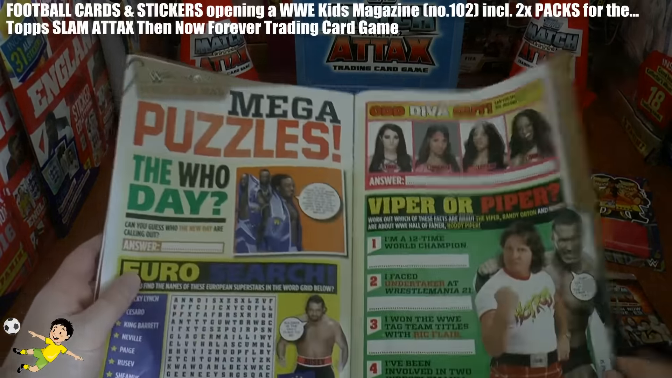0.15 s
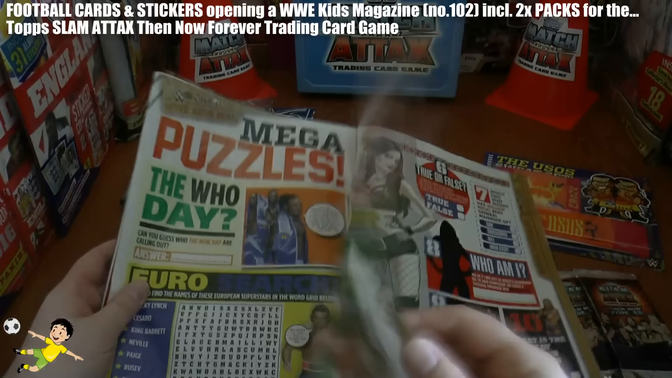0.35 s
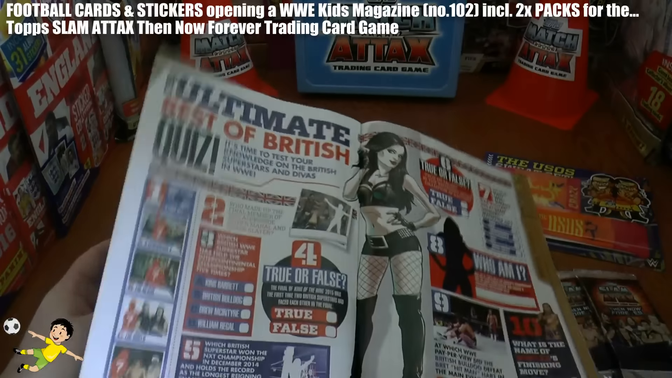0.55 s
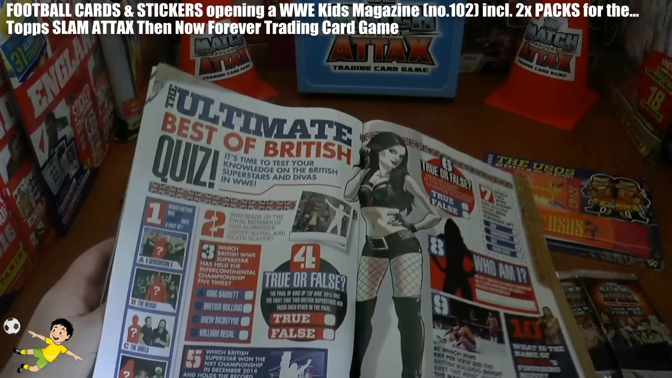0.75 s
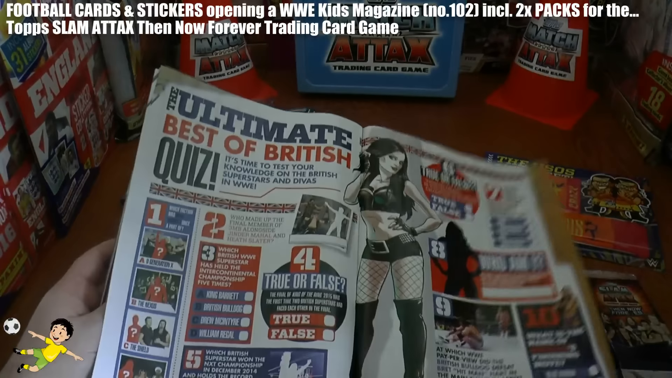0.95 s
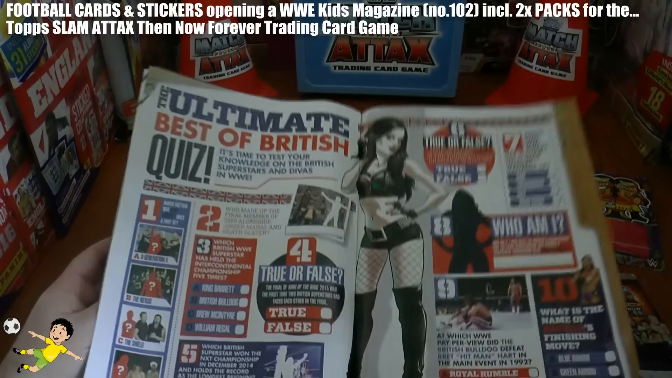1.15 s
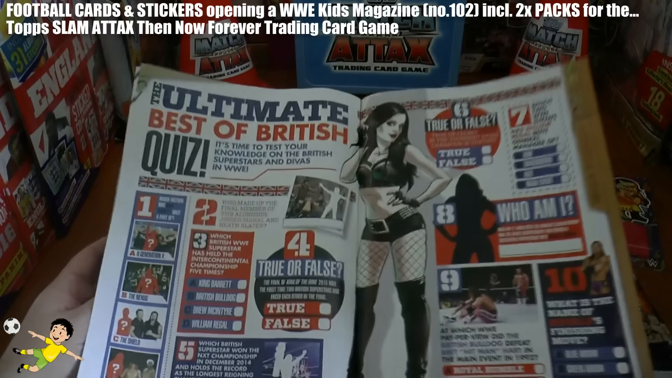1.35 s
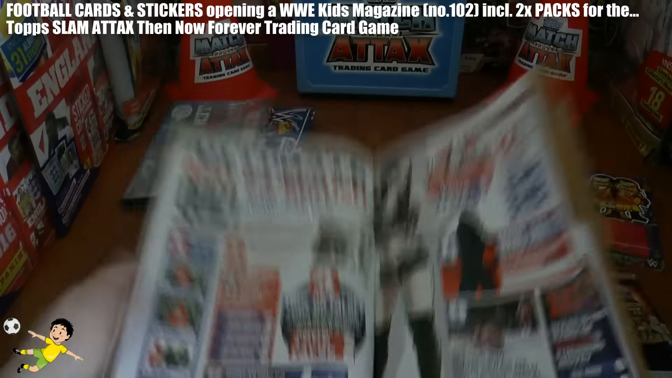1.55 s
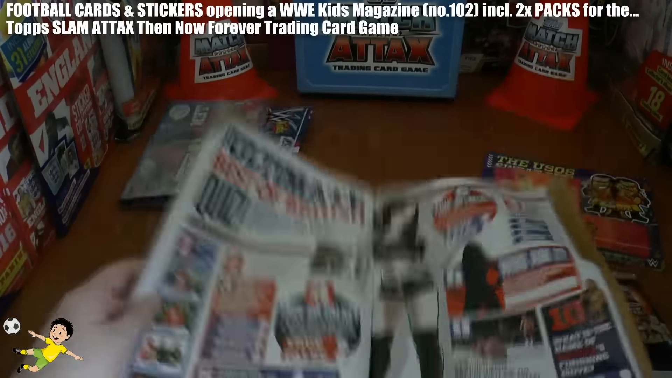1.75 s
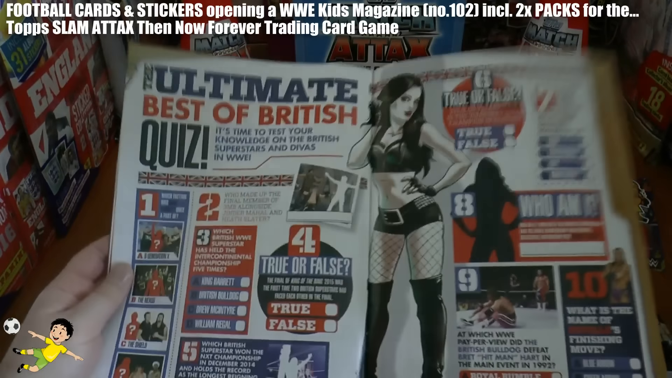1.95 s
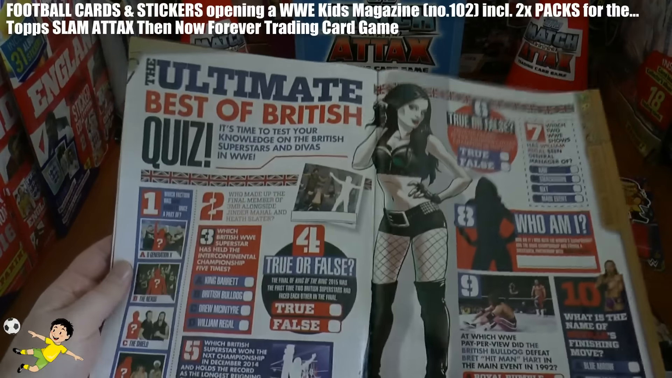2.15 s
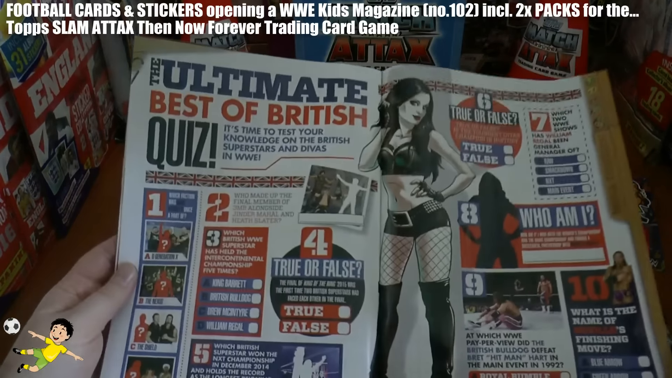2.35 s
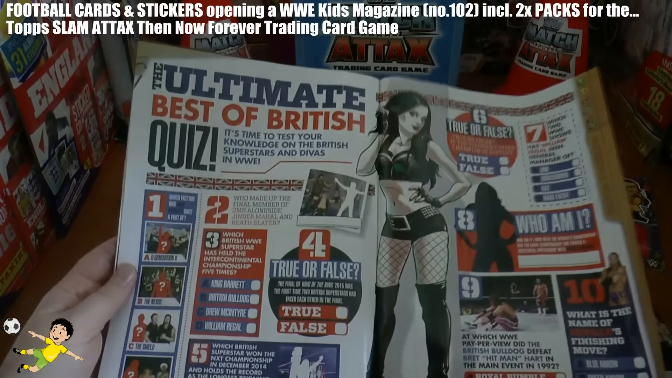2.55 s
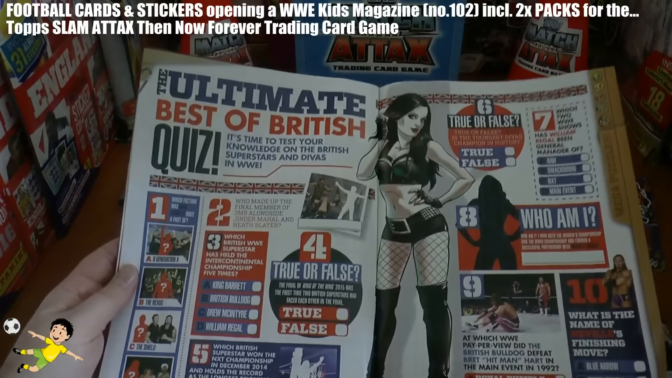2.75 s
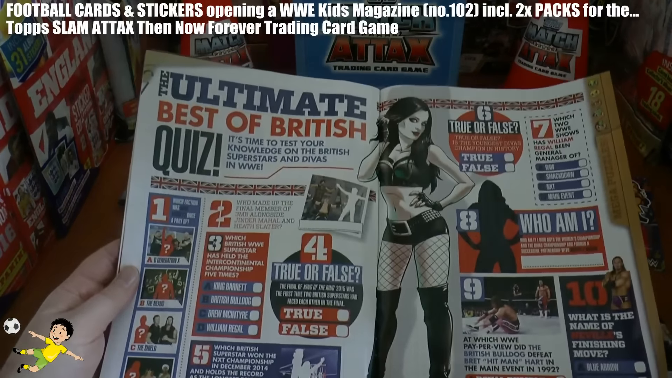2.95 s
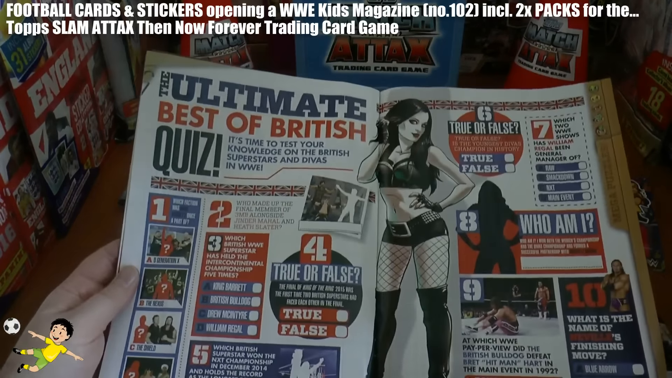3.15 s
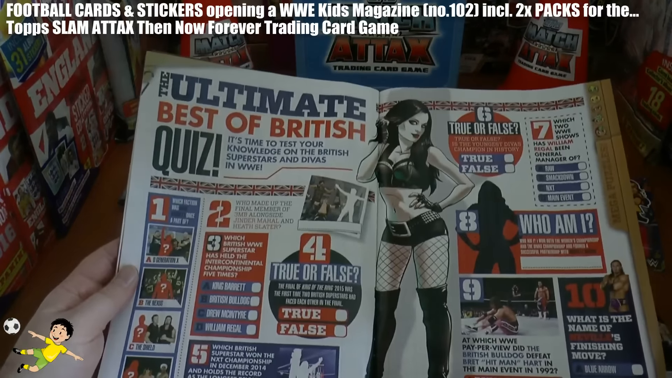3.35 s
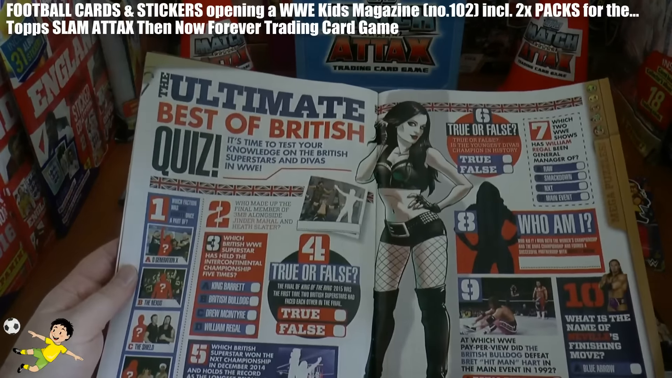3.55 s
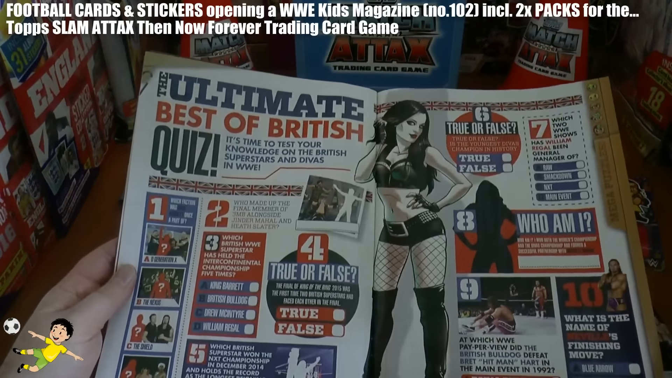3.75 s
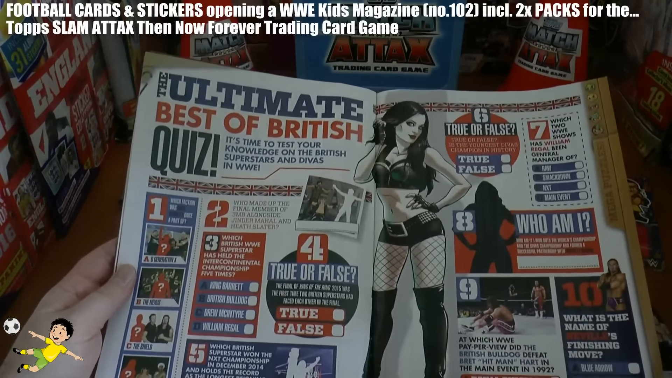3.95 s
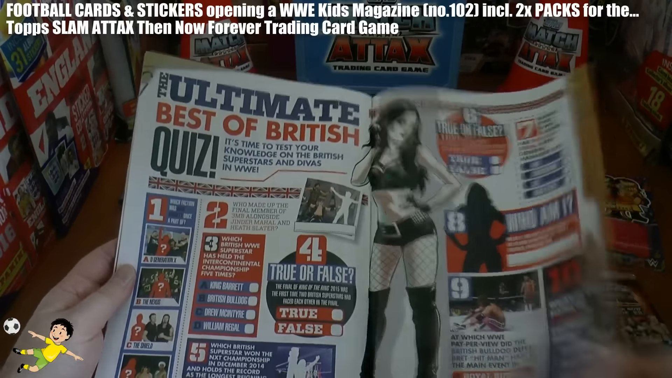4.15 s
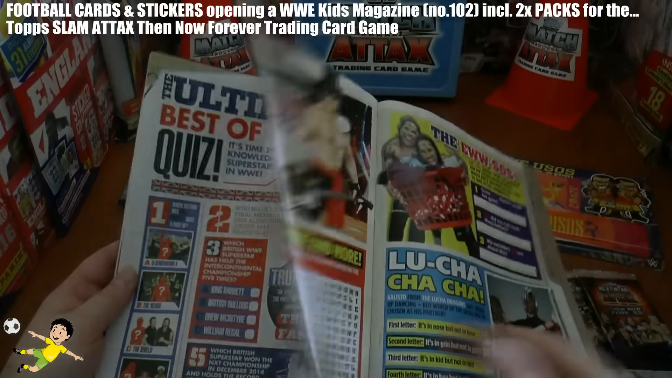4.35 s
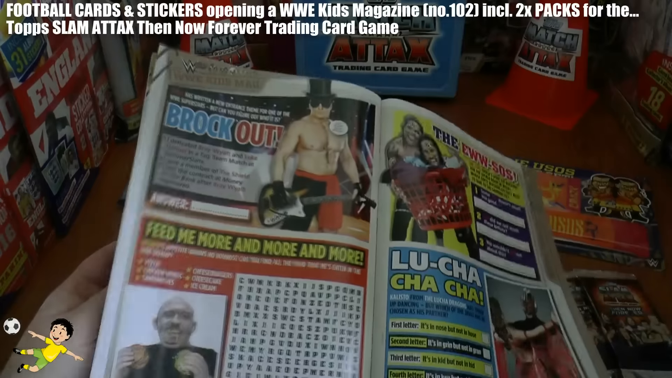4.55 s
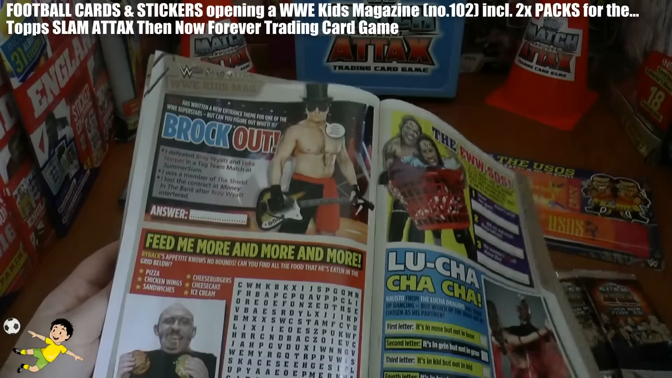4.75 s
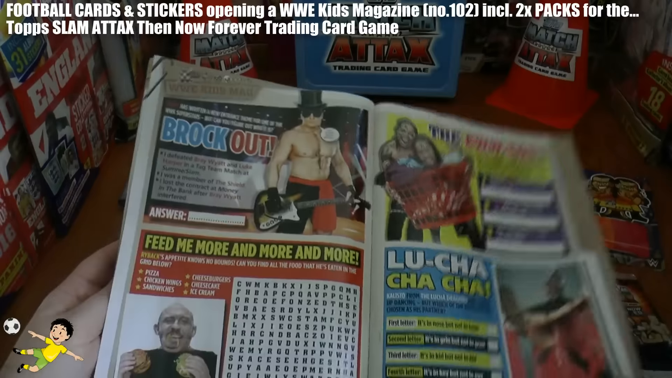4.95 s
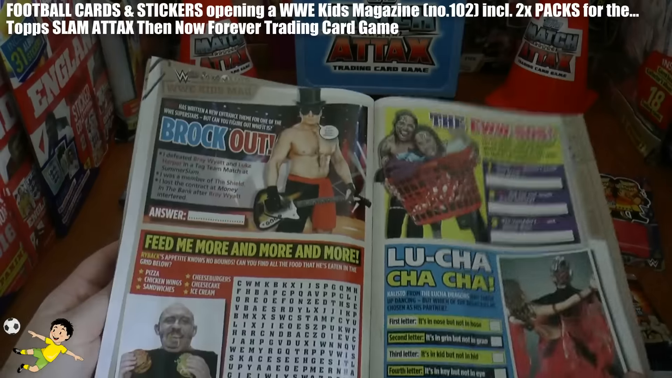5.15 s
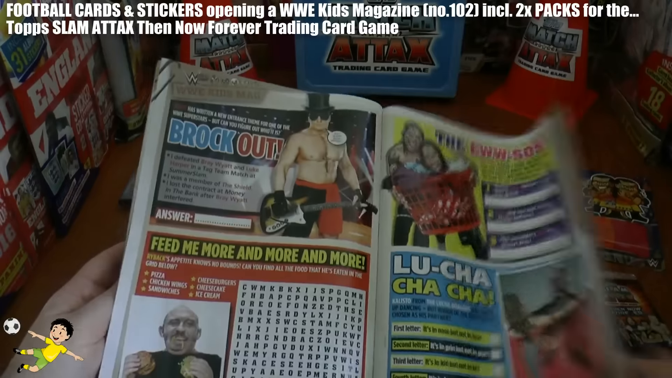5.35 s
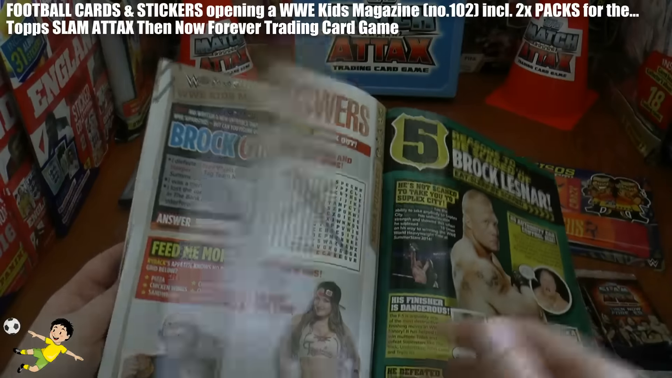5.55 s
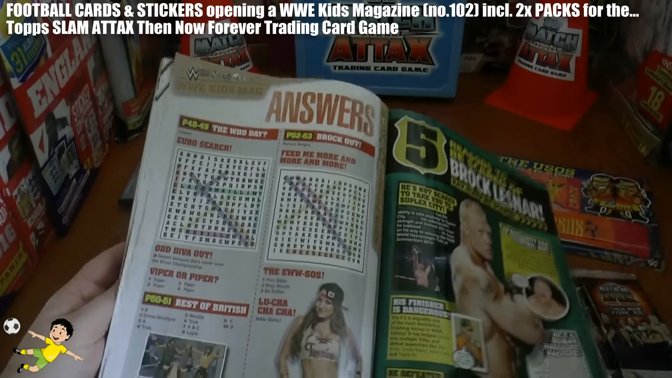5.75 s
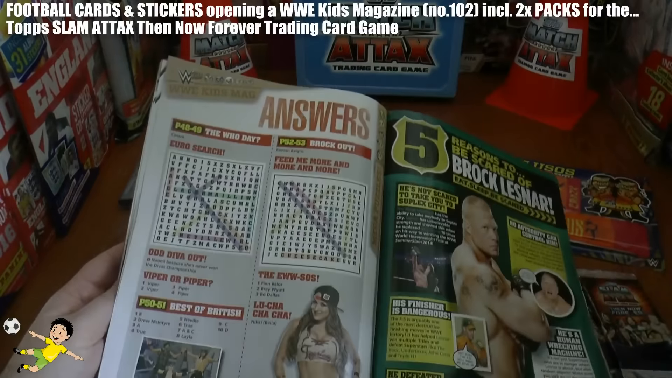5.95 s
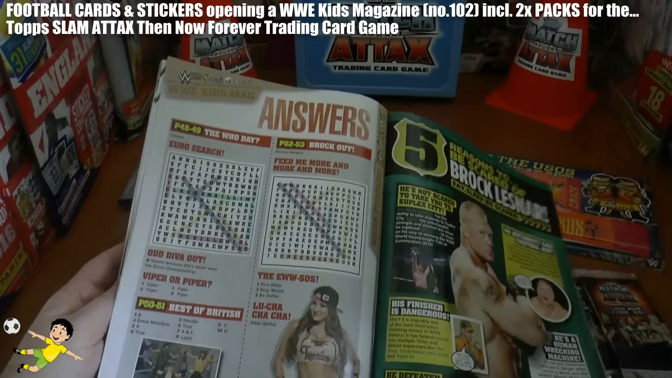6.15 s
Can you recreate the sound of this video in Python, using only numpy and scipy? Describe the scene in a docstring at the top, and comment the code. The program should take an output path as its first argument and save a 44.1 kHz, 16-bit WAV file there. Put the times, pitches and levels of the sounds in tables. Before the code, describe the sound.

Three glossy magazine pages are turned close by with crisp rustles and soft thumps, with a spine pop and a quiet pause.

```python
"""A desk in a small room: a glossy magazine is leafed through, close to the microphone.
Three pages are turned: fingers slide and squeak under the sheet, it crinkles, buckles, whips over
and lands on the stack with a soft thump. Between turns the magazine is flexed so that its spine
pops, then held almost still. Desk reflections and a short room tail colour the sound."""
import sys
import numpy as np
from scipy import signal
from scipy.fft import rfft, irfft
from scipy.io import wavfile

SR = 44100
rng = np.random.default_rng(int(sys.argv[2]) if len(sys.argv) > 2 else 0)


def log_audio(samples):
    """Write samples as a 16-bit WAV file to the path given in sys.argv[1]."""
    # one column per channel
    frames = np.atleast_2d(samples).T
    # limit to full scale, then quantise
    limited = np.clip(frames, -1, 1)
    pcm = np.round(limited * 32767).astype(np.int16)
    wavfile.write(sys.argv[1], SR, pcm)


N = 272934
TIME = np.arange(N) / SR
TYPICAL_DB = -49.5  # reference handling level


def from_db(db):
    """Decibels to gain."""
    return 10 ** (np.asarray(db) / 20)


def unit_energy(x):
    """Scale to a sum of squares of 1."""
    return x / np.sqrt(np.sum(x ** 2) + 1e-20)


def rms_one(x):
    """Scale to rms 1."""
    return x / np.sqrt(np.mean(x ** 2) + 1e-20)


def at_hz(points, hz):
    """Interpolate a table over log frequency."""
    f, value = np.transpose(points)
    return np.interp(np.log(np.maximum(hz, 1)), np.log(f), value)


def butter(x, order, hz, kind="low"):
    """Butterworth filter."""
    return signal.sosfilt(signal.butter(order, hz, kind, fs=SR, output="sos"), x)


def causal(curve, size=4096):
    """Minimum-phase impulse response of a curve of dB against Hz."""
    cepstrum = irfft(np.log(from_db(curve(np.fft.rfftfreq(size, 1 / SR)))))
    cepstrum[1:size // 2] *= 2
    cepstrum[size // 2 + 1:] = 0
    return irfft(np.exp(rfft(cepstrum)))


def coloured(x, spectrum):
    """Give a white signal a spectrum at equal power."""
    return signal.fftconvolve(x, unit_energy(causal(lambda hz: at_hz(spectrum, hz))))[:len(x)]


def ring(x, hz, t60_s):
    """Damped resonance."""
    r, w = from_db(-60 / (t60_s * SR)), 2 * np.pi * hz / SR
    return signal.lfilter([1, 0, -1], [1, -2 * r * np.cos(w), r * r], x)


def add(out, at_s, sound):
    """Mix a sound in at a time."""
    start = max(0, int(at_s * SR))
    part = out[start:start + len(sound)]
    part += sound[:len(part)]


def grains(per_s, spread_db, size=N):
    """Random impulses, a few much larger than the rest; rms 1."""
    born = rng.random(size) < per_s / SR
    sign = rng.choice([-1, 1], size)
    return rms_one(born * sign * from_db(spread_db * np.minimum(rng.exponential(1, size), 4)))


def flutter(rate_hz):
    """Smooth random wobble; rms 1."""
    return rms_one(butter(rng.standard_normal(N), 2, rate_hz))


def burst(decay_s, size):
    """Exponentially decaying white noise."""
    return rng.standard_normal(size) * np.exp(-TIME[:size] / decay_s)


def effort_db(at_s):
    """How hard the hands work the magazine, re typical."""
    # handling: (time [s], level [dB])
    handling = [(0.0, -46), (0.15, -48), (0.5, -38), (0.77, -50), (1.24, -57), (1.46, -58), (1.72, -43.5),
                (1.83, -40.5), (2.12, -53), (2.31, -54), (2.5, -46), (2.58, -48.5), (2.72, -60.5),
                (2.95, -65), (4.17, -70.5), (4.26, -64.5), (4.39, -39.5), (4.43, -41), (4.62, -46.5),
                (4.84, -60.5), (5.08, -61), (5.24, -56.5), (5.38, -43.5), (5.55, -42), (5.96, -54),
                (6.19, -59)]
    return np.interp(at_s, *np.transpose(handling)) - TYPICAL_DB


def slide_gain():
    """Each slide speeds up and slows down along a bell curve."""
    # finger or sheet on the gloss: (peak time [s], level [dB], rise [s], fall [s])
    slides = [(.03, -58.5, 0.0083, .33), (.165, -45.5, 0.039, .04), (.455, -33.5, 0.045, .055),
              (0.658, -50.5, .02, 0.056), (.81, -50.5, 0.075, 0.066), (.98, -47, 0.028, 0.036),
              (1.06, -58, 0.037, 0.11), (1.535, -48, 0.039, 0.052), (1.73, -54, 0.025, 0.062),
              (2.255, -53, .01, 0.046), (2.41, -52.5, 0.036, .05), (2.53, -50, 0.041, 0.053),
              (2.674, -46.5, 0.032, 0.041), (4.16, -71, 0.019, .06), (4.359, -33, 0.064, 0.046),
              (4.79, -56, 0.14, 0.063), (5.11, -54, 0.035, .03), (5.19, -47.5, .003, 0.1),
              (5.37, -48.5, 0.05, .045), (5.595, -30, 0.045, 0.011), (5.89, -47.5, 0.029, 0.032),
              (6.05, -54.5, 0.05, 0.014)]
    gain = np.zeros(N)
    for at_s, db, rise_s, fall_s in slides:
        width_s = np.where(TIME < at_s, rise_s, fall_s)
        gain += from_db(db) * np.exp(-np.minimum(((TIME - at_s) / width_s) ** 2, 20))
    return gain


def turn_gain(attack_s=.018, release_s=.023):
    """The crinkle of a turn swells, holds while the page travels and dies."""
    # page turns: (start [s], length [s], level [dB])
    turns = [(0.336, 0.22, -35.5), (4.243, 0.25, -42.5), (5.524, 0.15, -33.5)]
    gain = np.zeros(N)
    for at_s, length_s, db in turns:
        before_s, after_s = np.maximum(at_s - TIME, 0), np.maximum(TIME - at_s - length_s, 0)
        gain += from_db(db) * np.exp(-before_s / attack_s - after_s / release_s)
    return gain


def rub(work_db, slide, lift_off_db=3.5):
    """Low rub of sheet on stack; its handling share stops growing once the sheet lifts off."""
    # rub spectrum: (frequency [Hz], density [dB])
    spectrum = [(40, -18.5), (100, -5.5), (170, 5.5), (350, 3.5), (750, -4.5), (1100, -4.5), (2000, -32)]
    handled = from_db(-57 + .91 * np.minimum(work_db, lift_off_db))
    gain = np.hypot(handled, from_db(-17.5) * slide)
    return gain * coloured(grains(per_s=2500, spread_db=6), spectrum)


def crinkle(work_db):
    """Fibres slip in clumps where the sheet bends, over a smooth brushing noise."""
    # crinkle spectrum: (frequency [Hz], density [dB])
    spectrum = [(200, -42), (800, -9.5), (1400, -1.5), (2100, 6.5), (3200, 4.5), (5000, -2), (8000, -14),
                (16000, -44)]
    clumps = from_db(6 * np.tanh(.7 * flutter(rate_hz=80)))
    slips = grains(per_s=800, spread_db=2.8)
    bending = coloured(rms_one(slips * clumps), spectrum)
    brushing = coloured(rng.standard_normal(N), spectrum)
    gain = np.hypot(from_db(-52.5 + work_db), turn_gain())
    return gain * (from_db(-1) * bending + from_db(-2) * brushing)


def slide_hiss(work_db, slide):
    """Dense tiny slips hiss where the glossy face slides."""
    # hiss spectrum: (frequency [Hz], density [dB])
    spectrum = [(800, -11.5), (3000, 5.5), (5000, 2.5), (6500, 1.5), (8500, -2), (10500, -3.5),
                (12500, -16), (15000, -25), (16000, -24)]
    gain = np.hypot(from_db(-61.5 + .92 * work_db), slide)
    return gain * coloured(grains(per_s=17000, spread_db=2.5), spectrum)


def gloss_hiss(work_db, slide):
    """Coating grains catch on a finger or sheet: a very high hiss, prominent in light strokes."""
    # coating spectrum: (frequency [Hz], density [dB])
    spectrum = [(6000, -30.5), (9500, -4.5), (12500, -0.5), (14500, -1), (16000, -7.5)]
    creep = from_db(-78.5 + .55 * work_db)  # holding fingers never lie quite still
    gain = from_db(-62.5) * ((slide + creep) / from_db(TYPICAL_DB)) ** .46
    return gain * coloured(rng.standard_normal(N), spectrum)


def background(mid_db=-70.5, side_re_mid_db=-9):
    """Quiet room noise and microphone hiss, stereo."""
    # noise floor: (frequency [Hz], density [dB])
    spectrum = [(20, 14), (60, 3), (100, 12.5), (170, 9.5), (250, 3.5), (350, 15.5), (450, -19),
                (1100, -20), (1900, -7), (3000, -14), (5000, -54), (8000, -21.5), (11000, -2.5),
                (16000, -23)]
    mid, side = [coloured(rng.standard_normal(N), spectrum) for _ in range(2)]
    side *= from_db(side_re_mid_db)
    return from_db(mid_db) * np.array([mid + side, mid - side])


def small_creases(count=60, spread_db=2.5, centre_hz=2600, range_oct=.42):
    """Random rows for snaps(): denser and louder under harder handling."""
    share = np.cumsum(from_db(effort_db(TIME) / 2))
    times_s = np.interp((np.arange(count) + rng.random(count)) / count, share / share[-1], TIME)
    loud, bright, long = rng.standard_normal((count, 3)).T
    db = -50 + effort_db(times_s) + spread_db * loud
    hz = centre_hz * 2 ** (range_oct * rng.uniform(-1, 1, count))
    treble_db = -13 + spread_db * bright
    crackle_ms = 4 * 2 ** long
    return list(zip(times_s, db, hz, treble_db, crackle_ms))


def snaps(hold_s=.0078, size=4096):
    """A crease flips with a click that rings a few cycles and sets off a run of smaller ones."""
    # creases, edge contacts: (time [s], level [dB], ring [Hz], treble re level [dB], crackle [ms])
    creases = [(.029, -40, 2370, -3.5, .6), (0.1124, -41, 2000, -16, 5.5), (.13, -37, 2360, -7, 2),
               (0.3883, -29.5, 2340, -19, 2.2), (0.612, -31.5, 2300, -5, 4.7),
               (0.6489, -32.5, 3560, -0.5, 2.6), (.7094, -36, 2160, -17, 19),
               (1.0524, -38, 3236, -30, 0.87), (1.2, -45.5, 1680, -13, 3), (1.3671, -38.5, 1940, -15, 2.7),
               (1.5003, -36.5, 2120, -5.5, 0.52), (1.6183, -31.5, 1930, -12, 56),
               (1.6267, -30.5, 2640, -15, 2.6), (1.6763, -34.5, 2270, -16, 4.8),
               (1.7067, -31, 2400, -4, 24), (1.7179, -21, 2030, -2, 1.1), (1.8205, -37, 2920, -27, 4.6),
               (1.845, -37.5, 2530, -1.5, 6.3), (1.9147, -34, 2660, -10, 9), (1.94, -35.5, 3160, -5.5, 2.4),
               (1.998, -39, 2400, -7.5, 9.7), (2.0512, -41.5, 3100, -7, 5.2), (2.1048, -43.5, 2740, -6, 19),
               (2.2449, -35, 2320, -2.5, 12), (2.365, -33.5, 2090, -8.5, .6),
               (2.4092, -30, 1920, -10.5, 1.4), (2.4609, -33, 2090, -9.5, 0.99),
               (2.6218, -39.5, 2090, -3, 7.7), (2.7586, -51, 2260, -23, 0.86),
               (3.1245, -52.5, 2000, -35, 2.2), (3.455, -63, 2120, -19, .4), (3.538, -59, 2230, -14, .5),
               (3.7189, -59, 2304, -5, 0.62), (3.8897, -63, 2020, -13, 1.2), (4.14, -58, 2250, -10, 27),
               (4.215, -43.5, 2600, -14, 21), (4.235, -35.5, 2350, -14, 7.5),
               (4.2489, -29.5, 2900, -11, 3.7), (4.2623, -25.5, 2020, -38, 5.5),
               (4.3105, -27.5, 3270, 6, 4.6), (4.6458, -39.5, 2260, -11.5, 5.1),
               (4.6828, -42, 2070, -24, 1.3), (4.8357, -46, 2550, -22, 9), (5.014, -51, 2930, -18, 0.46),
               (5.187, -44, 2830, -8, 9.8), (5.3381, -38.5, 3230, -4.5, 3.3), (5.4405, -52, 2440, -24, 5),
               (5.46, -32, 2060, -32, 28), (5.5916, -27, 2900, -11, 2.7), (5.7758, -44.5, 1830, -29, 2),
               (5.832, -39.5, 2600, -6.5, 13)]
    # fibre crack spectrum: (frequency [Hz], density [dB])
    crack_spectrum = [(150, -4), (700, 6.5), (1400, 15), (4500, 8.5), (6500, -9), (10000, -37.5),
                      (16000, -64.5)]
    # onset treble spectrum: (frequency [Hz], density [dB])
    edge_spectrum = [(2000, -21.5), (4500, 8.5), (6500, 4.5), (10000, 1.5), (13000, -9.5), (16000, -24.5)]
    out = np.zeros(N)
    for at_s, db, hz, treble_db, crackle_ms in creases + small_creases():
        fade = np.exp(-TIME[:size] * 1e3 / crackle_ms)
        run = unit_energy(grains(per_s=6000, spread_db=1.5, size=size) * fade)
        clicks = run * from_db(-1) * np.sqrt(crackle_ms / 2)
        clicks[0] += 1
        # the bent patch rings; the stiffer, the shorter
        patch = unit_energy(ring(ring(clicks, hz, t60_s=7 / hz), hz, t60_s=3 / hz))
        # fibres give way in turn; the first carry the treble
        fibres = signal.fftconvolve(clicks, burst(.0028, size))[:size]
        first = signal.fftconvolve(clicks, burst(.0006, size))[:size]
        crack = from_db(-5) * unit_energy(coloured(fibres, crack_spectrum))
        edge = from_db(treble_db) * unit_energy(coloured(first, edge_spectrum))
        add(out, at_s, from_db(db) * np.sqrt(hold_s * SR) * (unit_energy(patch + crack) + edge))
    return out


def squeaks():
    """Irregular stick-slip on the gloss: a rough tone whose pitch follows the stroke's speed."""
    # fingertip or page edge drags: (unsteadiness [Hz], rows of (time [s], pitch [Hz], level [dB]))
    drags = [(263.5, [(.04, 2416, -59), (.115, 2044, -41), (.15, 1952, -47)]), (170, [(1.08, 6840, -67),
             (1.22, 6700, -70), (1.27, 5700, -65), (1.35, 4970, -70)]), (129.3, [(3.05, 2904, -78),
             (3.75, 3064, -73), (4.0, 2970, -80)]), (424, [(5.195, 2830, -55), (5.222, 2867, -46),
             (5.295, 2164, -47), (5.34, 2020, -61)])]
    out = np.zeros(N)
    for unsteady_hz, stroke in drags:
        times_s, hz, db = np.transpose(stroke)
        phase = 2 * np.pi * np.cumsum(np.interp(TIME, times_s, hz)) / SR
        tone = rms_one(flutter(unsteady_hz) * np.cos(phase) + flutter(unsteady_hz) * np.sin(phase))
        touching = (TIME > times_s[0]) & (TIME < times_s[-1])
        out += tone * from_db(np.interp(TIME, times_s, db)) * touching
    return out


def struck(modes, tilt_db_per_oct, contact_s, scuff_db, size=16000):
    """A push with a short scuff rings modes; a harder blow tilts toward the upper ones."""
    push = from_db(scuff_db) * unit_energy(burst(contact_s, size))
    push[0] += 1
    sound = np.zeros(size)
    for k, (hz, db, t60_s) in enumerate(modes):
        tilt_db = tilt_db_per_oct * np.log2(np.clip(hz, 100, 400) / 100)
        sound += (-1) ** k * from_db(db + tilt_db) * unit_energy(ring(push, hz, t60_s))
    return unit_energy(butter(sound, 2, hz=1300))


def stack_thumps(settle_s=.024, first_loss_db=11.5, later_loss_db=6):
    """Hands and pages thump the stack; three uneven, fading touches follow each landing."""
    # stack and desk modes: (frequency [Hz], level [dB], t60 [s])
    modes = [(45, -18.5, 0.055), (93.3, 5.5, 0.13), (133.7, 5.5, 0.078), (178, 0, 0.031), (245.5, 3.5, 0.1),
             (270, 0, 0.01), (346.7, -1, 0.1), (445.4, -10, 0.089), (567, -13.5, 0.039),
             (808, -13.5, 0.047)]
    # hand bumps and a page's late, soft settling thump: (time [s], level [dB], hardness [dB/octave])
    bumps = [(0.127, -51.5, 12), (.277, -37.5, 10.5), (.406, -38, 7), (1.499, -50.5, 10), (1.618, -30, 8.5),
             (1.707, -35, 2), (1.722, -29.5, 8.5), (2.04, -50, 9), (2.245, -52, 10.5), (2.41, -51, 7),
             (2.647, -42, 10.5), (3.122, -60.5, 10), (4.228, -35.5, 8.5), (4.423, -39, 6.5),
             (4.766, -52.5, -3), (5.394, -44, 10.5), (5.546, -38, 44), (6.056, -50.5, 1.5),
             (6.165, -45.5, -2.5)]
    # page landings: (time [s], level [dB], hardness [dB/octave])
    landings = [(0.702, -33.5, 0), (4.646, -36, 3), (5.834, -31.5, 1)]
    touches = []
    for at_s, db, hardness in landings:
        for k in range(3):
            delay_s = settle_s * (k + 1 + rng.uniform(-.346, .311))
            touches.append((at_s + delay_s, db - first_loss_db - later_loss_db * k, hardness))
    out = np.zeros(N)
    for at_s, db, hardness in bumps + landings + touches:
        add(out, at_s, from_db(db) * struck(modes, hardness, contact_s=.005, scuff_db=-10))
    return out


def flaps(size=12000):
    """A buckle runs across the sheet: an avalanche of slips that swells quickly and dies."""
    # buckles and whips: (time [s], level [dB], treble re level [dB], rise [s], decay [s])
    buckles = [(.276, -29, -7, 0.0034, 0.007), (0.404, -20, -12, 0.005, 0.0049),
               (.415, -16.5, -4.5, .0017, 0.01), (.486, -25.5, -12, 0.018, 0.03),
               (1.720, -31.5, -6.5, 0.0018, 0.038), (2.646, -29, -6.5, 0.0014, .0064),
               (4.278, -25, -18, 0.0056, 0.033), (4.296, -20, -8.5, 0.0021, 0.014),
               (4.308, -21, 0.5, 0.00097, 0.0034), (4.351, -21.5, -8.5, 0.0075, 0.0095),
               (4.473, -36.5, -34, 0.027, 0.0074), (4.534, -34.5, -21, 0.0015, 0.0089),
               (5.391, -37, -9, 0.0093, 0.0067), (5.501, -21, -11, 0.0026, 0.014),
               (5.549, -16.5, -7, 0.0031, 0.008), (5.588, -22, -3, 0.0015, 0.015),
               (5.608, -22, -3, 0.0024, 0.027)]
    # body spectrum: (frequency [Hz], density [dB])
    body_spectrum = [(50, -32.5), (130, -15.5), (400, -12), (900, -15.5), (1700, -5), (2600, 2), (3600, -2),
                     (5000, -3.5), (8000, -33.5), (16000, -59.5)]
    # treble spectrum: (frequency [Hz], density [dB])
    edge_spectrum = [(1500, -56), (4000, -13.5), (6200, 11.5), (8000, 5.5), (10500, 3), (12500, -2.5),
                     (15000, -17), (16000, -25.5)]
    out, t = np.zeros(N), TIME[:size]
    for at_s, db, treble_db, rise_s, decay_s in buckles:
        attack = np.sin(np.pi / 2 * np.minimum(t / rise_s, 1)) ** 2
        swell = attack * np.exp(-np.maximum(t - rise_s, 0) / decay_s)
        body, edge = [coloured(grains(per_s=18000, spread_db=1, size=size) * swell, spectrum)
                      for spectrum in (body_spectrum, edge_spectrum)]
        add(out, at_s, from_db(db) * (body + from_db(treble_db) * edge))
    return out


def spine_pops():
    """The folded spine pops through and rings hollow."""
    # pops: (time [s], level [dB])
    pops = [(1.618, -48), (1.7180, -22.5)]
    # spine modes: (frequency [Hz], level [dB], t60 [s])
    modes = [(723, -15, 0.1), (770, 3, 0.019), (602, -5.5, 0.018)]
    out = np.zeros(N)
    for at_s, db in pops:
        add(out, at_s, from_db(db) * struck(modes, tilt_db_per_oct=0, contact_s=.004, scuff_db=-14))
    return out


def near_scatter(onset_s=.0015, decay_s=.009, size=2600):
    """Impulse response of boxes around the desk; long waves pass round them."""
    t = TIME[:size]
    echoes = grains(per_s=5000, spread_db=1.5, size=size) * np.exp(-t / decay_s) * (t > onset_s)
    return unit_energy(butter(echoes, 1, hz=300, kind="high"))


def room_tail(rise_s=.0034, size=24000):
    """Impulse response of diffuse reflections, with a decay time per band."""
    # room decay: (frequency [Hz], t60 [s])
    decay = [(100, 0.23), (700, 0.21), (2500, 0.1), (7000, 0.05), (15000, 0.24)]
    t, tail = TIME[:size], np.zeros(size)
    edges_hz = np.geomspace(50, 18000, 9)
    for low, high in zip(edges_hz, edges_hz[1:]):
        band = butter(rng.standard_normal(size), 2, [low, high], "band")
        tail += band * from_db(-60 * t / at_hz(decay, np.sqrt(low * high)))
    return unit_energy(tail * np.clip(t / rise_s - .5, 0, 1))


def room(x, sway_hz=1.3):
    """Direct sound, early echoes and tail; only reflections differ between channels."""
    # first echoes off desk and boxes: (delay [ms], level [dB])
    echoes = [(3.5, -21), (6.8, -22.5), (9.9, -25)]
    sway = 2 * np.pi * sway_hz * TIME

    def reflected(paths):
        """Moving pages shift the sound between two sets of paths."""
        return sum(signal.oaconvolve(x * share, paths())[:N] for share in (np.cos(sway), np.sin(sway)))
    mid = x + from_db(-15) * reflected(near_scatter) + from_db(-12) * reflected(room_tail)
    for delay_ms, db in echoes:
        add(mid, delay_ms / 1000, from_db(db) * x)
    side = from_db(-15) * reflected(near_scatter) + from_db(-14) * reflected(room_tail)
    return np.array([mid + side, mid - side])


def scene():
    """The magazine in the room, just right of centre."""
    work_db, slide = effort_db(TIME), slide_gain()
    paper = rub(work_db, slide) + crinkle(work_db)
    paper += from_db(3.5) * slide_hiss(work_db, slide) + gloss_hiss(work_db, slide)
    paper += from_db(1.5) * snaps() + from_db(3) * flaps() + squeaks()
    paper += from_db(30.5) * stack_thumps() + from_db(22) * spine_pops()
    return (room(paper) + background()) * from_db([[-.2], [.2]])


def record(dry, ceiling=.58, cutoff_hz=15900):
    """Desk colouring, soft peak limiting, steep low-pass."""
    # desk-to-microphone reflection peaks and dips: (centre [Hz], width [octaves], gain [dB])
    bands = [(518, 0.056, -4.5), (558.4, 0.039, 8.5), (671.5, 0.038, -4), (720, 0.12, 11), (898, 0.054, -3),
             (1276, 0.075, -8.5), (1372, 0.13, 8), (1523, 0.032, -6.5), (1744, 0.12, 3.5), (2070, 0.011, 5),
             (2200, 0.045, 1.5), (3150, 0.031, 1)]
    desk = causal(lambda f: sum(db * np.exp(-.5 * (np.log2(np.maximum(f, 1) / hz) / width_oct) ** 2)
                                for hz, width_oct, db in bands))
    wet = signal.oaconvolve(dry, desk[None], axes=1)[:, :N]
    rounded = wet / (1 + (wet / ceiling) ** 4) ** .25
    return signal.sosfilt(signal.ellip(10, .2, 80, cutoff_hz, fs=SR, output="sos"), rounded)


dry = scene()
out = record(dry)
log_audio(out)
```